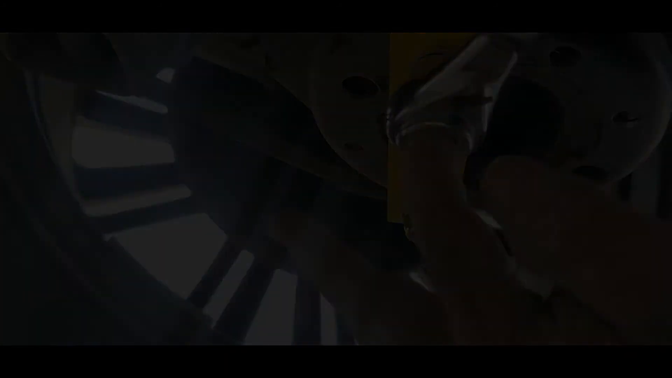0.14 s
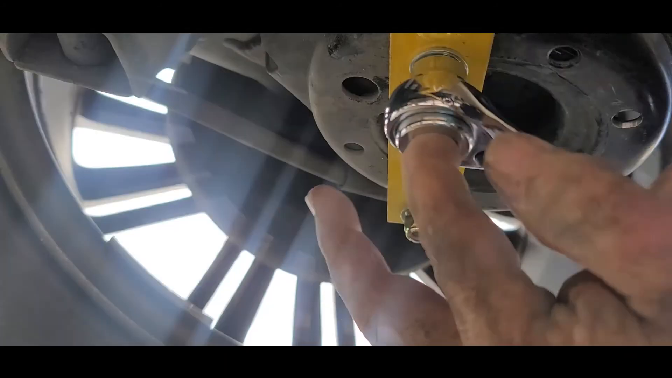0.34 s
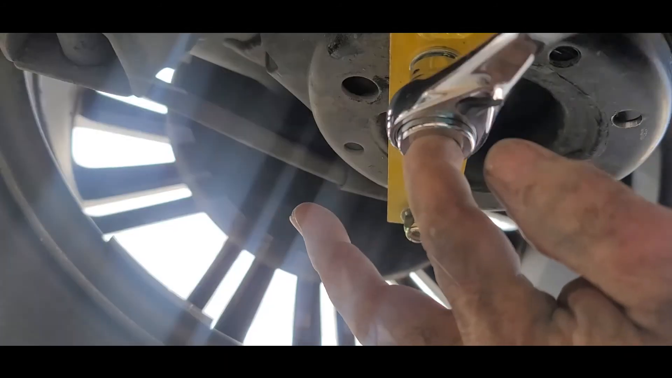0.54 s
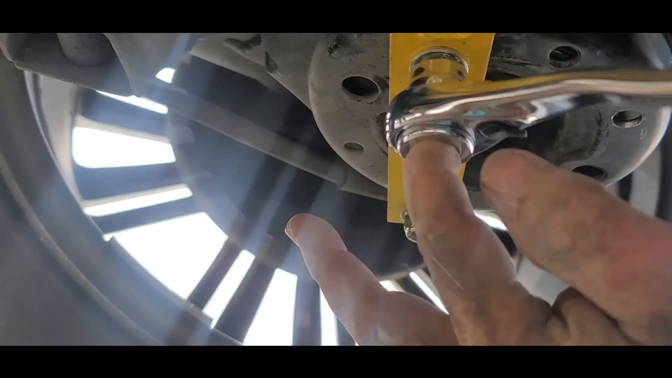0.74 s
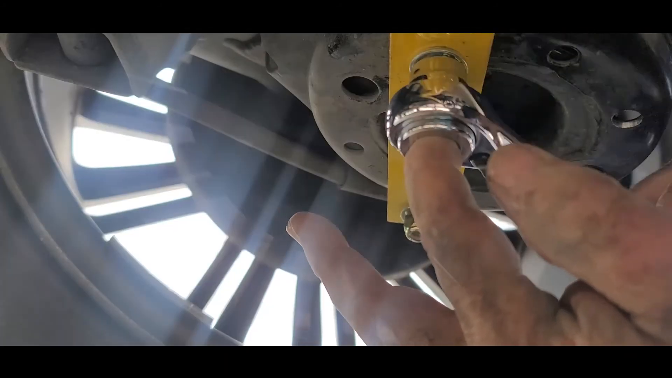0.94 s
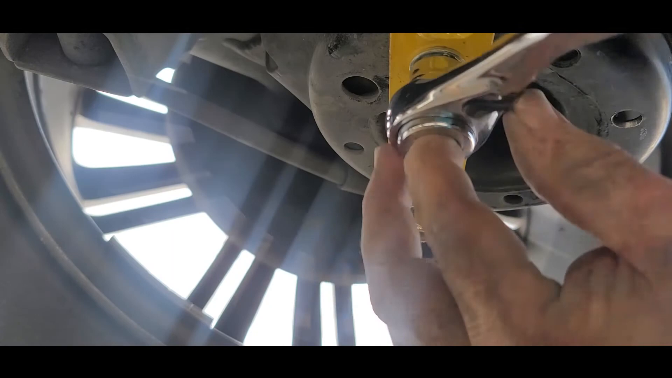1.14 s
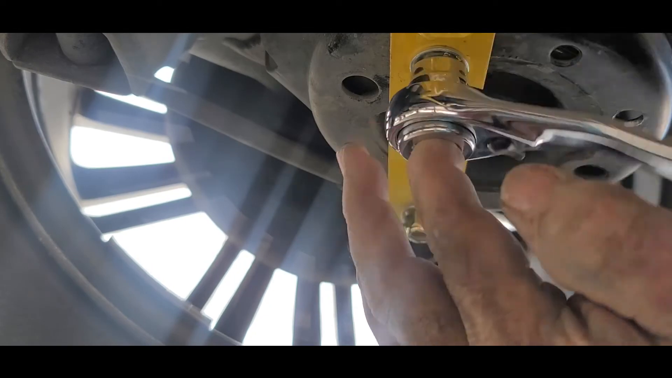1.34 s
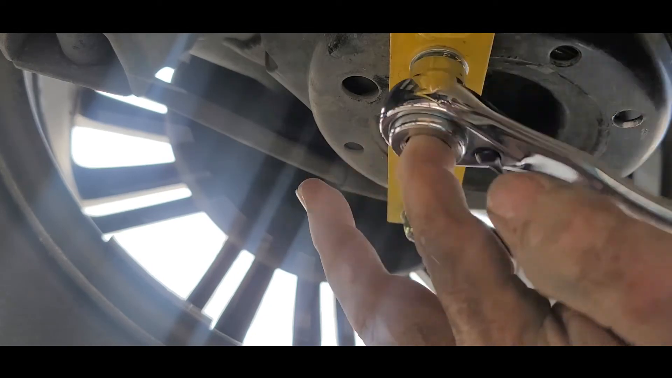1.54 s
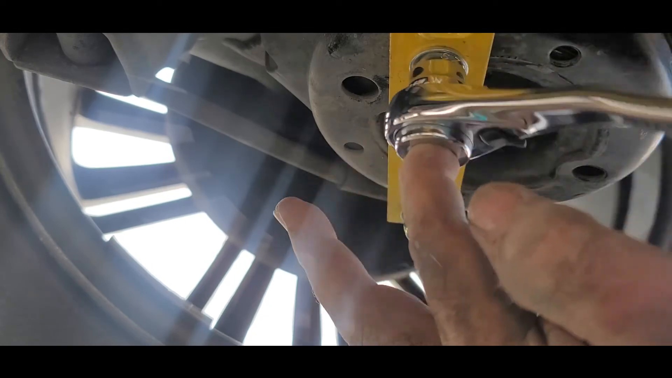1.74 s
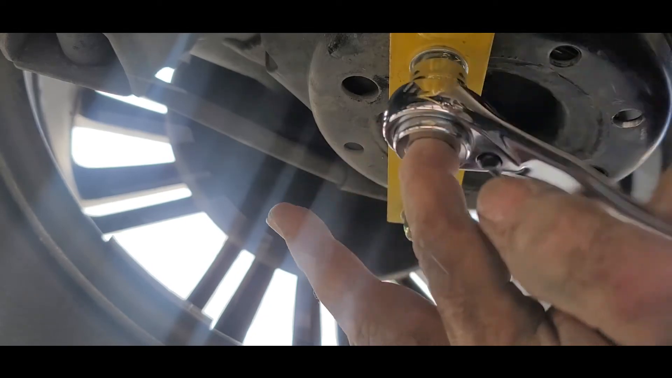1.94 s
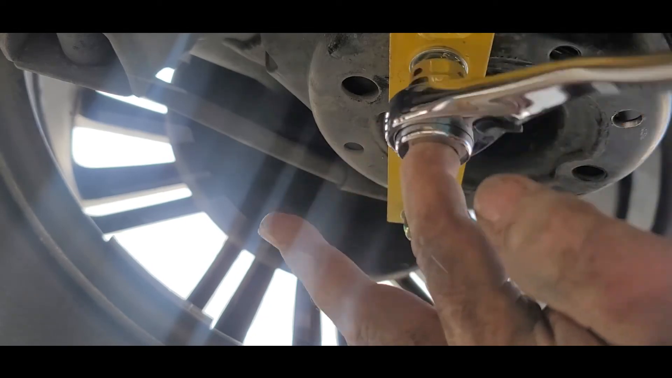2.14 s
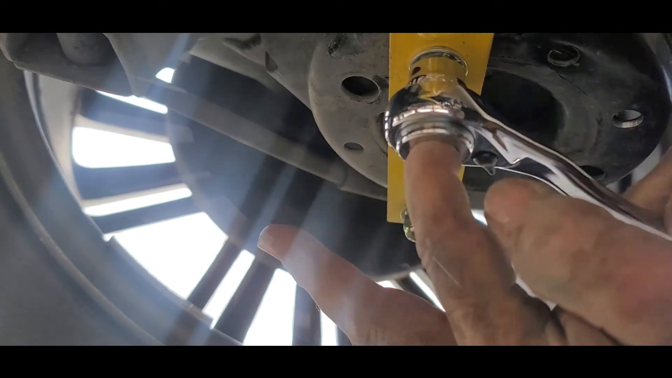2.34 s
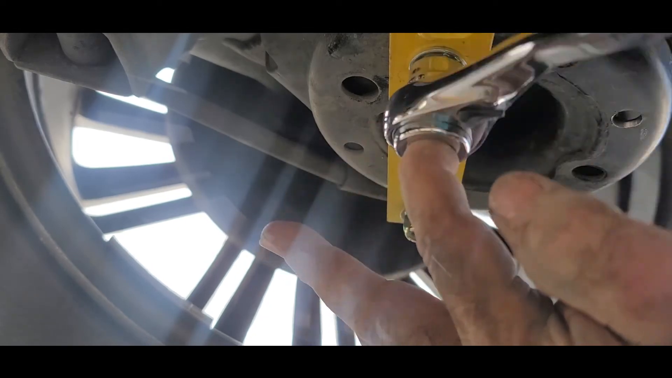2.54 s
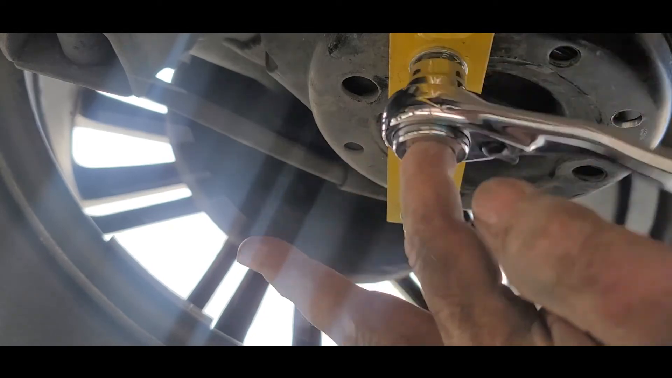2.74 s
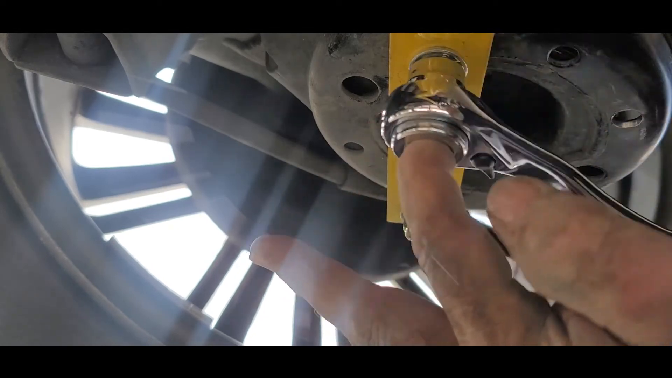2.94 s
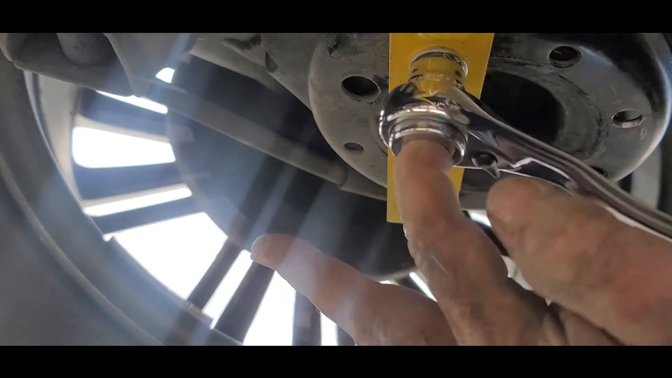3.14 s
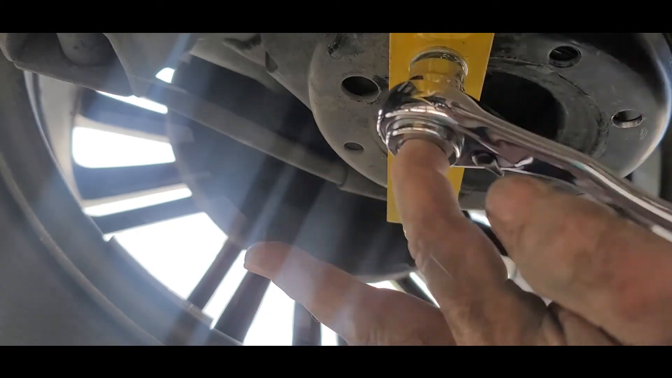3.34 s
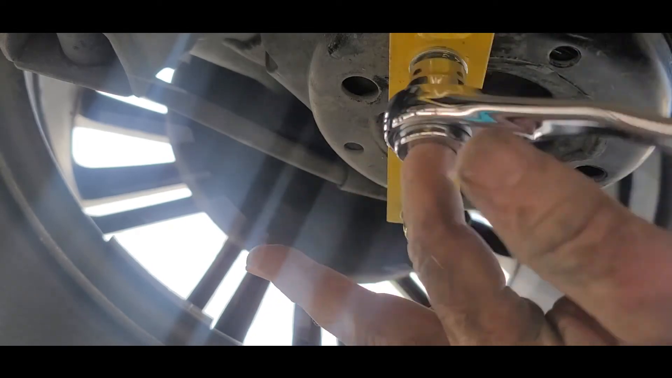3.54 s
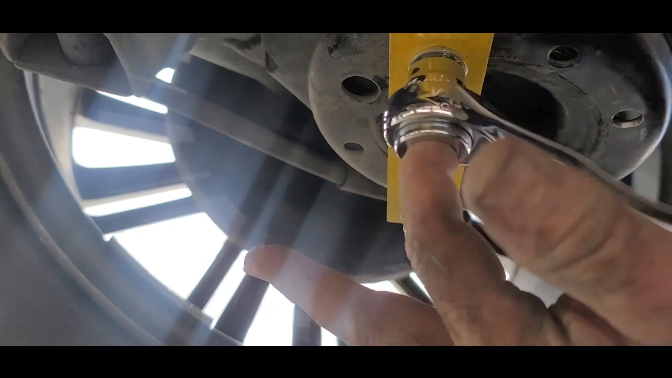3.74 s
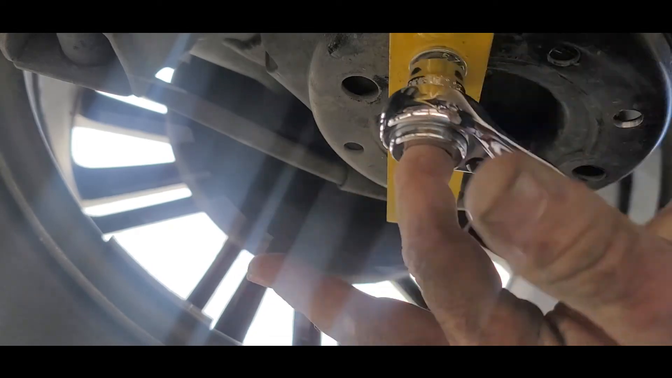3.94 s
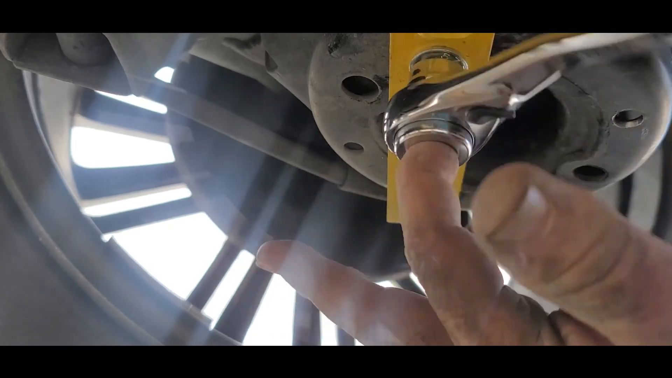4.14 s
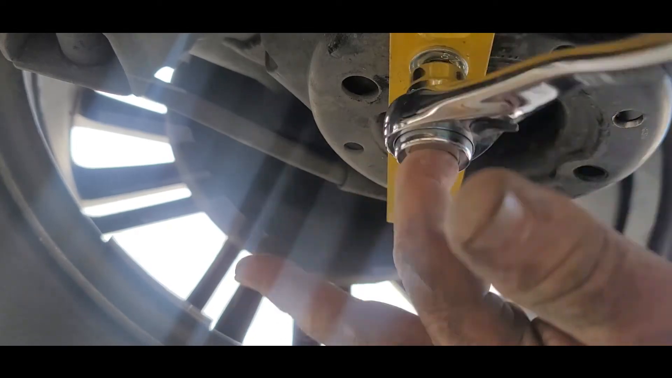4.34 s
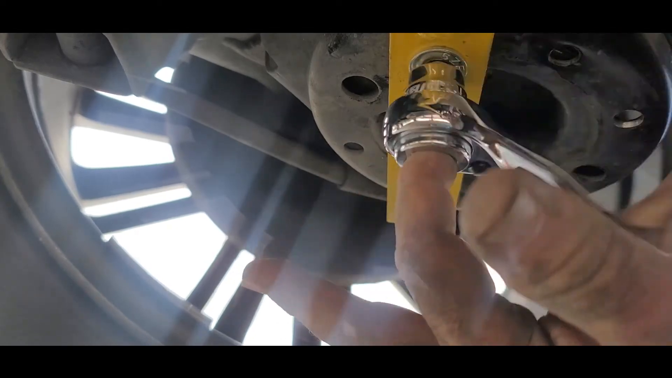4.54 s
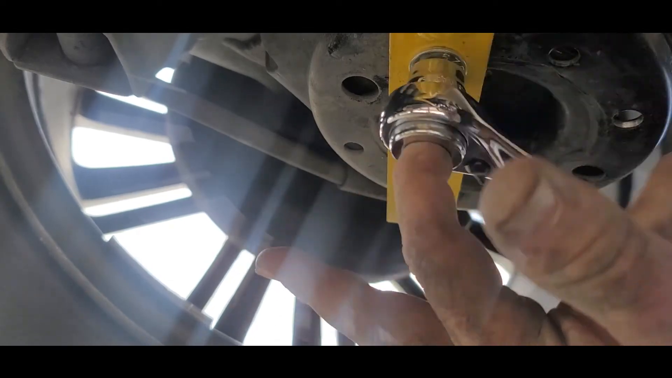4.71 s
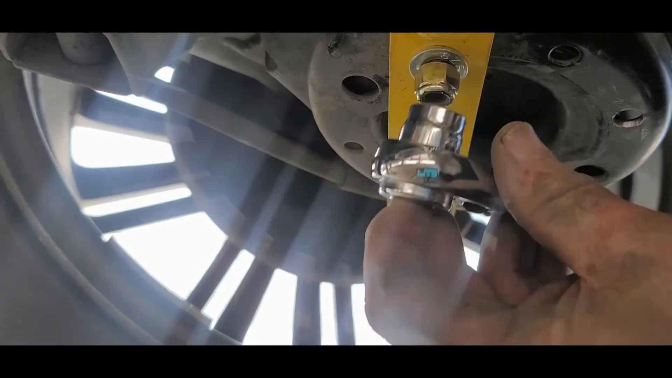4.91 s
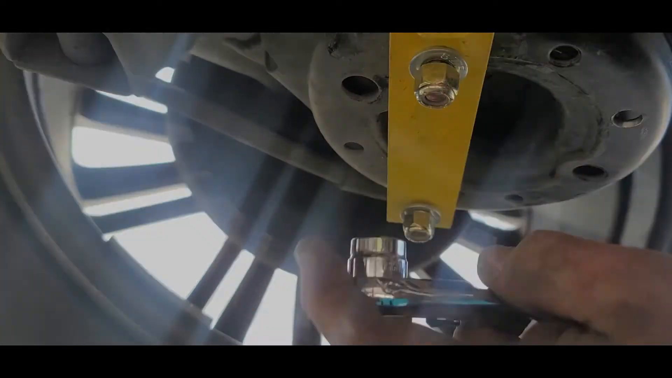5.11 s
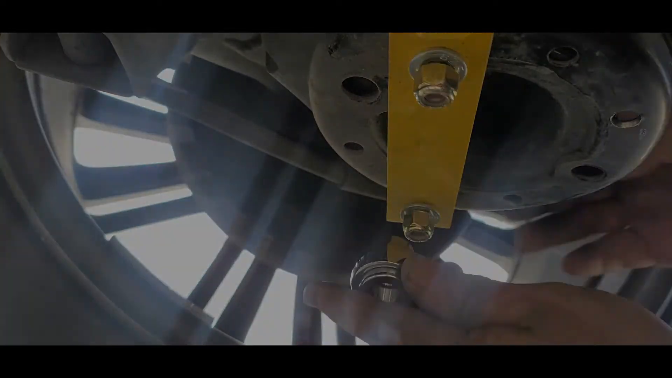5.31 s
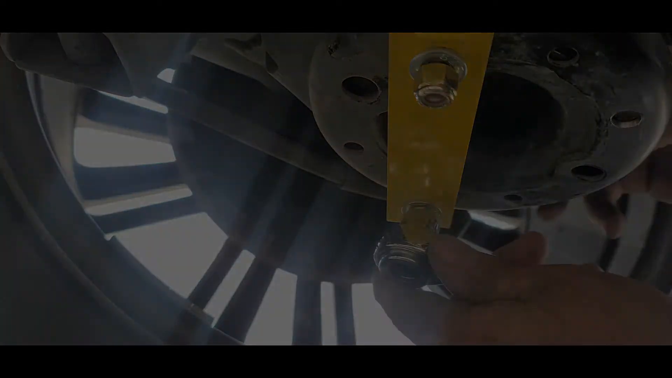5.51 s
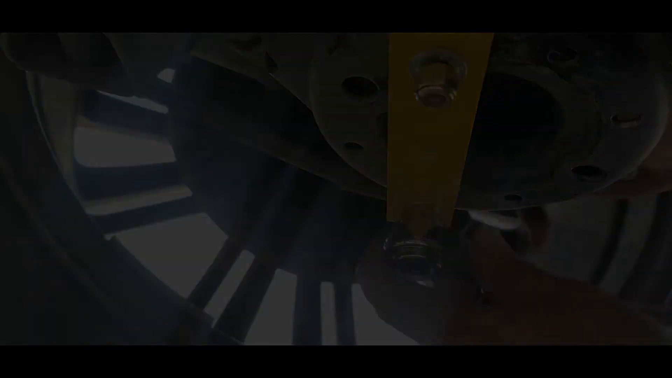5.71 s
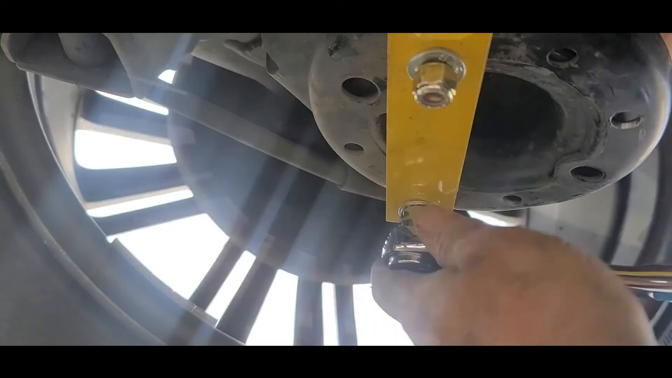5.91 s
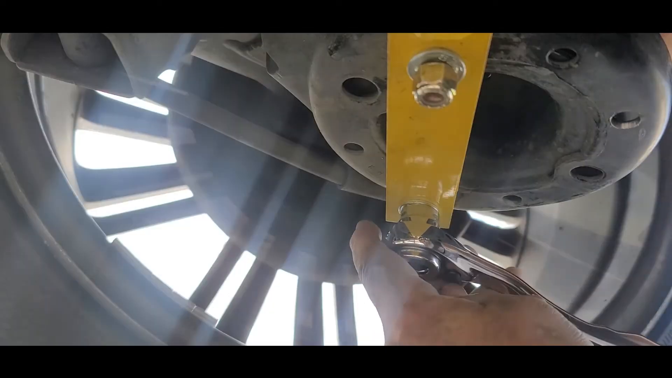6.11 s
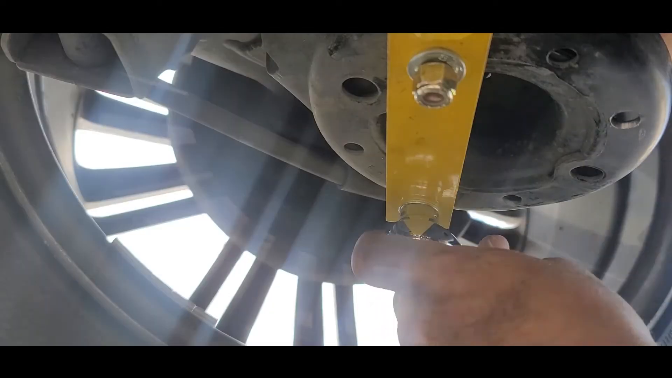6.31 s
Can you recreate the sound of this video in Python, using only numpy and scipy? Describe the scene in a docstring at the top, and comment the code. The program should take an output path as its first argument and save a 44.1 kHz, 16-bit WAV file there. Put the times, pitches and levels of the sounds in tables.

```python
"""A ratchet wrench is worked quickly to and fro on a nut under a car: on each back swing the pawl's blows
on the teeth excite dense decaying modes, filtered by head and handle; blunter single clicks fall between.
The socket knocks as damped sines and slides as gritty noise as it is pulled off and set on a second nut.
Soft bumps ring low. A car passes far outside the quiet garage, as shaped noise over low rumble and still air."""
import sys
import numpy as np
from scipy import signal
from scipy.fft import rfft, irfft
from scipy.io import wavfile

SR = 44100
rng = np.random.default_rng(int(sys.argv[2]) if len(sys.argv) > 2 else 0)


def waveform_to_disk(signal):
    """Save audio, clipped to [-1, 1], as 16-bit WAV at the path in sys.argv[1]."""
    frames = np.transpose(np.atleast_2d(signal))
    scaled = np.clip(frames, -1, 1) * 32767
    samples = np.round(scaled).astype(np.int16)
    wavfile.write(sys.argv[1], SR, samples)


N = 280917
TIME = np.arange(N) / SR  # [s]
TOP_HZ = 15800  # upper edge of the sound
CHATTER_S = .003  # time the pawl chatters before it seats


def amp(db):
    """Logarithmic level: decibels to amplitude gain."""
    return 10 ** (np.asarray(db) / 20)


def unit(x):
    """Energy normalisation: scale each channel to an energy of 1."""
    return x / np.sqrt(np.sum(x ** 2, axis=-1, keepdims=True))


def add(track, start_s, sound):
    """Superposition: mix a short stereo sound into a track."""
    i = max(int(start_s * SR), 0)
    part = sound[:, :max(N - i, 0)]
    track[:, i:i + part.shape[1]] += part


def through(x, response):
    """Linear filtering: convolve a sound with an impulse response."""
    return signal.oaconvolve(np.atleast_2d(x), np.atleast_2d(response), axes=1)[:, :N]


def colour(points, peaks=(), size=4096):
    """Minimum phase: the causal response of a (Hz, dB) spectrum with resonances on top."""
    hz, db = np.transpose(points)
    f = np.maximum(np.arange(size // 2 + 1) * SR / size, 1)
    power = amp(np.interp(np.log(f), np.log(hz), db)) ** 2
    for centre, width, peak_db in peaks:
        detuning = (f - centre) / width * 2
        power = power + (amp(peak_db) / (1 + detuning ** 2)) ** 2
    # folding the cepstrum onto positive time makes the response causal
    cepstrum = irfft(np.log(power) / 2)
    cepstrum[1:size // 2] *= 2
    cepstrum[size // 2 + 1:] = 0
    return unit(irfft(np.exp(rfft(cepstrum))))


def fade(t, t60):
    """Exponential damping: 60 dB in t60 seconds."""
    return np.exp(-np.log(1000) * t / t60)


def onset(t, rise_s):
    """Gradual excitation: a smooth rise from 0 to 1."""
    return 1 - np.exp(-(t / rise_s) ** 2)


def ring(t60, rise_s=1e-5, size=4096):
    """High modal density: countless modes dying together are decaying noise, independent in each channel."""
    t = TIME[:size]
    return unit(rng.standard_normal((2, size)) * fade(t, t60) * onset(t, rise_s))


def noise(points):
    """Spectral shaping: stereo white noise takes a colour, at an rms of 1."""
    return through(rng.standard_normal((2, N)), colour(points))


def hump(start_s, length_s):
    """Half-sine envelope: a smooth swell from 0 to 1 and back."""
    out, span = np.zeros(N), slice(*np.searchsorted(TIME, [start_s, start_s + length_s]))
    out[span] = np.sin(np.pi * (TIME[span] - start_s) / length_s)
    return out


def wander(rate):
    """Slow random modulation: random values joined by straight lines, rate of them a second."""
    values = rng.standard_normal(1000)
    return np.interp(TIME * rate, np.arange(len(values)), values)


def grit():
    """Stick-slip friction: tiny uneven slips of steel on steel, rms 1."""
    slips = np.repeat(amp(3 * rng.standard_normal(N // 100 + 1)), 100)[:N]
    return unit(slips * rng.standard_normal((2, N))) * np.sqrt(N)


def contact(t60, rise_s, count=48, size=1024):
    """Modal excitation: one point of contact happens to excite a random set of modes up to TOP_HZ."""
    t = TIME[:size]
    hz = (np.arange(count) + rng.random(count)) * TOP_HZ / count
    real, imaginary = rng.standard_normal((2, 2, count))
    modes = np.zeros((2, size // 2 + 1), complex)
    modes[:, (hz * size / SR).astype(int)] = real + 1j * imaginary
    return unit(irfft(modes) * fade(t, t60) * onset(t, rise_s))


def steel(body, snap_db=-11, snap_t60=0.0011):
    """Impact: a blow chatters up to a snap and rings a shared body and modes of its own."""
    contact_t60, own = .012, .95
    snap = np.roll(ring(snap_t60, size=1024), int(CHATTER_S * SR), axis=1)
    return unit(body + own * contact(contact_t60, CHATTER_S)) + amp(snap_db) * snap


# the first, slow turn: tooth rate at its start [Hz], time to rest [s]
COAST_HZ, COAST_S = 153.3, .12
# its clicks, before the shared click gains: treble [dB], body to treble [dB], weakening [dB per s]
COAST_DB, COAST_BODY_DB, COAST_SAG_DB_PER_S = -23, -8.5, 53


def coasting_clicks(scatter_db=1.4):
    """Uniform deceleration: a handle that brakes evenly passes its teeth ever later and more softly."""
    teeth = COAST_HZ * COAST_S / 2
    when = COAST_S * (1 - np.sqrt(1 - np.arange(teeth) / teeth))
    clicks = []
    for s in when:
        db = COAST_DB - COAST_SAG_DB_PER_S * s + scatter_db * rng.standard_normal()
        clicks.append((s, db, COAST_BODY_DB))
    return clicks


# single clicks of the pawl and of the play in the socket, before the shared gains:
# (time [s], treble level [dB], body relative to treble [dB])
PAWL_CLICKS = [(.2113, -61, 7.5), (2.4272, -66, 17), (2.5713, -64, 13), (2.694, -32, -1.5),
               (2.7588, -33.5, -4), (2.843, -31.5, 0), (3.018, -33, 1), (3.0375, -42, -1),
               (3.0503, -47, 7.5), (3.3604, -26.5, -8.5), (3.3827, -25.5, -14), (3.475, -25.5, -9.5),
               (3.5366, -65, 23.5), (3.68, -30, -5.5), (3.8517, -31.5, -1), (3.8791, -59, 5),
               (4.0853, -58.5, 9.5), (4.3326, -33, -4.5), (4.3886, -51, -5), (4.539, -43.5, 3.5),
               (4.6245, -30.5, 0), (4.7741, -36.5, -4), (4.9865, -29.5, -7), (5.6385, -28.5, -6),
               (5.9383, -25, -5.5), (6.105, -26, -8), (6.2373, -25, -3)]


def single_clicks(body, head, body_db=-1):
    """Contact hardness: the blunter a click, the more body it has against its treble."""
    out = np.zeros((2, N))
    split = signal.butter(4, 8800, fs=SR, output="sos")
    for s, db, blunt_db in coasting_clicks() + take_up_clicks() + list(PAWL_CLICKS):
        click = through(steel(body), head)
        low = signal.sosfiltfilt(split, click)
        treble = unit(click - low)
        add(out, s - CHATTER_S / 2, amp(db) * (treble + amp(body_db + blunt_db) * unit(low)))
    return out


# colour of the ratchet head: (frequency [Hz], relative left level [dB], relative right level [dB])
HEAD_COLOUR = [(86.7, -15, -27.5), (325, -18.5, -11), (682, -13.5, -24.5), (784, -31.5, -28.5),
               (2175, -22.5, -26.5), (3050, -16.5, -15.5), (5020, -15.5, -14.5), (6510, -9, -7),
               (7690, -12.5, -17.5), (9370, -18.5, -18.5), (10240, -11.5, -4), (12350, -1, -2.5),
               (14370, -8, -11.5), (15540, -14, -13.5)]
# bending resonances of the handle: (frequency [Hz], width [Hz], relative level [dB])
HANDLE_MODES = [(574, 124, -13), (1095, 39, -16.5), (1404, 166, -16), (1668, 240, -13.5)]


def ratchet(swing_db=-4.0, click_db=16, body_t60=0.029):
    """Source and filter: swings and single clicks sound through the same head and handle."""
    body = ring(body_t60, CHATTER_S, size=1024)
    head = [colour(np.array(HEAD_COLOUR)[:, [0, side]], HANDLE_MODES) for side in (1, 2)]
    swings = through(back_swings(body, body_t60), head)
    return amp(swing_db) * swings + amp(click_db) * single_clicks(body, head)


def loose_handle(ring_hz=3130, ring_db=-62, ring_t60=.4, size=16000):
    """Free vibration: held loosely in the first turn, the handle rings on after each tooth."""
    out, t = np.zeros((2, N)), TIME[:size]
    for s, db, _ in coasting_clicks():
        tone = np.sin(2 * np.pi * (ring_hz * t + rng.random((2, 1))))
        add(out, s, amp(ring_db + db - COAST_DB) * fade(t, ring_t60) * tone)
    return out


# steel slides on steel: (time [s], length [s], level [dB])
STEEL_SLIDES = [(0, .15, -51.5), (2.784, .0094, -53), (4.881, .036, -55), (5.048, 0.024, -60),
                (5.086, 0.037, -70.5), (5.366, 0.021, -56.5), (5.382, 0.053, -73), (5.529, 0.041, -60),
                (5.628, 0.018, -54), (5.818, 0.034, -63.5), (5.853, .049, -61)]
# colour of the sliding: (frequency [Hz], relative level [dB])
SLIDING_COLOUR = [(150, -19), (600, 6.5), (900, -15.5), (1500, 5), (2100, -6.5), (2900, 3), (6300, 5),
                  (8800, -9.5), (12000, 0.5), (16000, -25.5)]
# the rim of the socket squeaks as it finds the nut: (frequency [Hz], width [Hz], relative level [dB])
SQUEAK_MODES = [(2718, 480, 31), (4400, 300, 12)]
SQUEAK_SPAN = (5.877, .036)  # start [s], length [s]


def slides(squeak_db=-60, rub_db=-83, rub_spread_db=5, rub_rate=16):
    """Friction noise: pressure scales the slips of first turn, brief slides, faint rubbing that comes and goes."""
    pressure = sum(amp(db) * hump(s, length) for s, length, db in STEEL_SLIDES)
    pressure = pressure + amp(rub_db + rub_spread_db * wander(rub_rate))
    slips = grit()
    squeak = through(slips * hump(*SQUEAK_SPAN), colour(SLIDING_COLOUR, SQUEAK_MODES))
    return through(slips * pressure, colour(SLIDING_COLOUR)) + amp(squeak_db) * squeak


# a distant car swells and fades, before its gain: (time [s], level [dB])
CAR_LEVEL = [(0, -65.5), (.45, -68.5), (.7, -61), (.85, -52), (1.0, -50), (1.12, -54), (1.3, -66.5),
             (1.6, -68.5), (2.2, -83)]
# colour of the car: (frequency [Hz], relative level [dB])
CAR_SPECTRUM = [(24, -3.5), (40, -4), (93, -1.5), (321, -10.5), (911, -15.5), (1140, -12), (1730, -20.5),
                (1890, -23), (4300, -39), (5490, -35.5), (8000, -39), (10400, -83.5), (17600, -120)]


def distant_car(gain_db=1.0, waver_db=2, waver_rate=24):
    """Amplitude modulation: the tyre roar of a far car is shaped noise, wavering with the road."""
    level_db = np.interp(TIME, *np.transpose(CAR_LEVEL))
    return noise(CAR_SPECTRUM) * amp(gain_db + waver_db * wander(waver_rate) + level_db)


# course of the low rumble, before its gain: (time [s], level [dB])
RUMBLE_LEVEL = [(0, -63), (.7, -61.5), (.85, -56.5), (1.4, -65), (2.4, -68.5), (3.6, -65.5), (4.8, -65),
                (5.3, -66.5), (5.9, -62), (6.05, -53), (6.37, -53)]
# colour of the rumble: (frequency [Hz], relative level [dB])
RUMBLE_SPECTRUM = [(20, -12.5), (45, -4), (72, -0.5), (110, -6), (170, -16), (300, -23), (900, -84)]


def low_rumble(gain_db=2, waver_db=1.15, waver_rate=9):
    """Amplitude modulation: low-frequency noise swells and sinks unsteadily."""
    level_db = np.interp(TIME, *np.transpose(RUMBLE_LEVEL))
    return noise(RUMBLE_SPECTRUM) * amp(gain_db + waver_db * wander(waver_rate) + level_db)


# colour of the still air: (frequency [Hz], relative level [dB])
AIR_SPECTRUM = [(88, -30.5), (150, 9.5), (1040, -14), (1360, -6), (2180, -24.5), (6260, -26.5), (8900, -32),
                (11000, -24), (16000, -34)]


def still_air(level_db=-72.5):
    """Stationary noise: a faint, steady, coloured hiss."""
    return amp(level_db) * noise(AIR_SPECTRUM)


# the socket knocks against nut and bolt, before the shared gain: (time [s], level [dB], ring pitch [Hz])
SOCKET_KNOCKS = [(0.005, -52, 1570), (0.06, -56, 1647), (4.917, -39.5, 1660), (5.558, -52, 1380),
                 (5.637, -45, 1400), (5.689, -37.5, 663), (5.744, -42, 1640), (5.783, -50.5, 1740),
                 (6.107, -52, 664), (6.295, -34, 582.6)]
# ring of socket and bracket, before scatter: (frequency [Hz], relative level [dB], t60 [s])
RING_MODES = [(565, -13.5, 0.0434), (686, -17, 0.12), (1116, -12.5, 0.059), (1313, -5, 0.032),
              (1632, 9.5, 0.013), (1840, -7, 0.04), (2516, -13.5, 0.034), (3210, -44, 0.36),
              (3357, -3.5, 0.025), (4300, -15, 0.0085)]


def socket(knock_db=19, pitch_db=1, pitch_t60=0.041, crack_db=-3, crack_t60=0.028, scatter_db=3, size=8000):
    """Modal synthesis: a knock rings all modes and one that suits its point of contact, with a crack."""
    out, t = np.zeros((2, N)), TIME[:size]
    seat_s = .003  # the faces take a moment to seat
    crack_colour = colour([(200, -5.0), (600, -3.5), (4000, -7.0), (7000, -15.5), (15000, -14.0)])
    for s, db, pitch_hz in SOCKET_KNOCKS:
        tone = np.zeros((2, size))
        for hz, mode_db, t60 in list(RING_MODES) + [(pitch_hz, pitch_db, pitch_t60)]:
            gain = amp(mode_db + scatter_db * rng.standard_normal())
            tone += gain * fade(t, t60) * np.sin(2 * np.pi * (hz * t + rng.random((2, 1))))
        tone = tone * onset(t, seat_s)
        crack = through(ring(crack_t60, seat_s), crack_colour)[:, :size]
        add(out, s, amp(db + knock_db) * (unit(tone) + amp(crack_db) * crack))
    return out


# dull rattle of the socket on its nut: (frequency [Hz], relative level [dB])
RATTLE_COLOUR = [(100, -12.5), (300, 0), (560, 5.5), (900, -5), (2100, -7), (3300, -5), (6400, -12),
                 (8800, -20.5), (12000, -15), (16000, -70)]


def play(lead_s=0.013, drag_db=-26, settle_s=0.023, settle_db=-32, scatter_db=2):
    """Backlash: the loose socket rocks just before a swing, drags in it and settles as the drive resumes."""
    lead_db, settling_s = -22, .045
    force = np.zeros(N)
    for start, end, db, _ in SWING_TIMES:
        lead, drag, settle = amp(db + scatter_db * rng.standard_normal(3))
        force += lead * amp(lead_db) * hump(start - lead_s, 2 * lead_s) ** 2
        force += drag * amp(drag_db) * hump(start, end - start)
        force += settle * amp(settle_db) * hump(end + settle_s - settling_s / 2, settling_s)
    return through(force * grit(), colour(RATTLE_COLOUR, HANDLE_MODES))


# every swing: usual tooth rate [Hz] and its spread between swings [share]
TOOTH_HZ, TOOTH_SPREAD = 204.6, .1
# the force climbs by ATTACK_DB within ATTACK_S, holds for a share of the swing, then sags
ATTACK_S, ATTACK_DB, HOLD_SHARE = 0.0084, 3.5, 0.33


def swing_blows(start, end, db, sag_db, jitter=.15, scatter_db=2.5, rebound=.47, rebound_db=-1.5, count=32):
    """Repeated impact: the pawl drops off each tooth and strikes the next; the force rises, holds and sags."""
    late, loud, late_again, loud_again = rng.standard_normal((4, count))
    tooth_hz = TOOTH_HZ * np.exp(TOOTH_SPREAD * rng.standard_normal())
    teeth = np.arange(count)
    drops = (teeth + jitter * late * (teeth > 0)) / tooth_hz
    strikes = drops + (rebound + jitter * late_again) / tooth_hz
    age = np.concatenate([drops, strikes])
    rising = np.clip(1 - age / ATTACK_S, 0, 1)
    slowing = np.clip((age / (end - start) - HOLD_SHARE) / (1 - HOLD_SHARE), 0, 1)
    force_db = db - ATTACK_DB * rising - sag_db * slowing
    force_db = force_db + np.concatenate([scatter_db * loud, rebound_db + scatter_db * loud_again])
    gains = amp(force_db) * np.sqrt(SR / tooth_hz)  # sparser blows are stronger
    return [(s, gain) for s, gain in zip(start + age, gains) if s < end]


def tint(spread_db, count=14):
    """Acoustic shadowing: a slight random colour, as the hand covers the tool differently."""
    hz = np.geomspace(300, TOP_HZ, count)
    return colour(np.transpose([hz, spread_db * rng.standard_normal(count)]), size=256)


# back swings of the handle, before the shared gain:
# (start [s], end [s], level [dB], sag as the hand slows [dB], negative where the force grows)
SWING_TIMES = [(.355, .398, -31.5, 5.5), (.51, .556, -32, 5), (.659, .698, -31, 3.5), (0.813, .858, -33, 4),
               (.964, 1.003, -31.5, 2), (1.109, 1.148, -31.5, 4), (1.262, 1.305, -32, 7.5),
               (1.411, 1.45, -31.5, 4), (1.55, 1.59, -33.5, -1), (1.686, 1.727, -33, 4),
               (1.826, 1.864, -33.5, -2), (1.957, 1.998, -31.5, 6.5), (2.096, 2.134, -31, 9),
               (2.233, 2.263, -31.5, 1.5), (2.363, 2.407, -31.5, 9.5), (2.504, 2.534, -33, -2),
               (2.648, 2.692, -33, 0), (2.8, 2.84, -30.5, 7), (2.963, 3.015, -32, 5.5),
               (3.15, 3.224, -32.5, 8.5), (3.367, 3.383, -40.5, -4), (3.423, 3.487, -34.5, 8),
               (3.634, 3.683, -33, 12), (3.795, 3.841, -33, 2.5), (3.966, 4.016, -32.5, 12),
               (4.122, 4.167, -31, 5), (4.288, 4.327, -30, 9.5), (4.44, 4.487, -31, 10),
               (4.586, 4.62, -30, 8.5), (4.737, 4.771, -30, 5.5), (5.945, 5.992, -37.5, -3.5),
               (6.176, 6.231, -34, 3.5), (6.342, 6.363, -30.5, 18)]


def back_swings(body, body_t60, tint_db=1.03):
    """Impact train: the blows of a swing share one ring and one colour."""
    out = np.zeros((2, N))
    for swing in SWING_TIMES:
        gripped = unit(body + ring(body_t60, CHATTER_S, size=1024))  # each new grip shifts the ring
        covered = tint(tint_db)
        for s, gain in swing_blows(*swing):
            add(out, s - CHATTER_S / 2, gain * through(steel(gripped), covered))
    return out


def take_up_clicks(delay_s=0.019, spread_s=.008, db=-68, body_db=11, scatter_db=3):
    """Backlash: shortly after a swing the drive takes up its play with a faint, blunt tick."""
    clicks = []
    for _, end, _, _ in SWING_TIMES:
        late, loud = rng.standard_normal(2)
        clicks.append((end + delay_s + spread_s * late, db + scatter_db * loud, body_db))
    return clicks


# the firmer bumps as the handle turns round and takes load, before the shared gain:
# (time [s], level [dB], pitch [Hz])
HANDLE_BUMPS = [(1.518, -53, 582.7), (1.652, -55.5, 490), (2.572, -47, 223.4), (2.639, -56.5, 430.1),
                (2.884, -54.5, 330.3), (3.044, -52, 263.6), (3.344, -47.5, 143.3), (3.534, -56, 601.5),
                (3.882, -49, 321.5), (4.041, -49.5, 483.6), (4.204, -52, 224.3), (4.66, -49.5, 131),
                (4.803, -48, 231.8), (5.901, -51, 153.3)]


def bumps(bump_db=22, t60=0.082, thud_t60=0.051, push_s=0.0021, size=8000):
    """Damped resonance: soft pushes of the hand set the suspension ringing low and briefly, with a thud."""
    out, t = np.zeros((2, N)), TIME[:size]
    thud_colour = colour([(60, -11.5), (250, 6.5), (600, -1), (1000, -10.0), (4000, -17.5), (15000, -33)])
    for s, db, hz in HANDLE_BUMPS:
        tone = np.sin(2 * np.pi * (hz * t + rng.random((2, 1)) / 2))
        tone = tone * fade(t, t60) * (1 - np.exp(-t / push_s))
        thud = through(ring(thud_t60, push_s), thud_colour)[:, :size]
        add(out, s, amp(db + bump_db) * (unit(tone) + unit(thud)))
    return out


def garage(x, near_db=-18, near_t60=0.11, tail_db=-34):
    """Reverberation: quick echoes from the wheel and underbody, and the faint tail of the room."""
    near_colour = colour([(100, 6.5), (600, 1), (3000, 3.0), (8000, -20.0), (16000, -43.5)])
    tail_colour = colour([(100, 0), (1400, 4), (3200, 0), (6500, -5), (12000, -13), (16000, -22)])
    near = through(ring(near_t60), near_colour)
    tail = through(ring(.9, size=40000), tail_colour)
    return x + amp(near_db) * through(x, near) + amp(tail_db) * through(x, tail)


def scene():
    """Superposition: the tool in the garage, over the car, the rumble and the air."""
    tool = ratchet() + loose_handle() + slides() + socket() + play() + bumps()
    return garage(tool) + distant_car() + low_rumble() + still_air()


def record(dry):
    """Band limiting: an elliptic low-pass cuts the top."""
    return signal.sosfilt(signal.ellip(10, .2, 70, TOP_HZ, fs=SR, output="sos"), dry)


dry = scene()
out = record(dry)
waveform_to_disk(out)
```